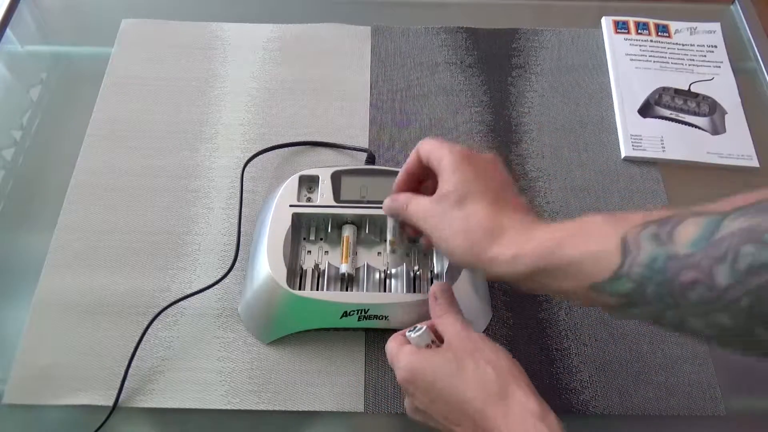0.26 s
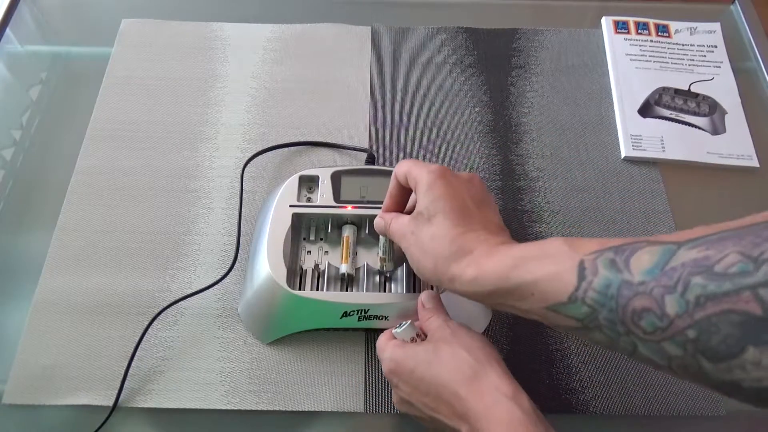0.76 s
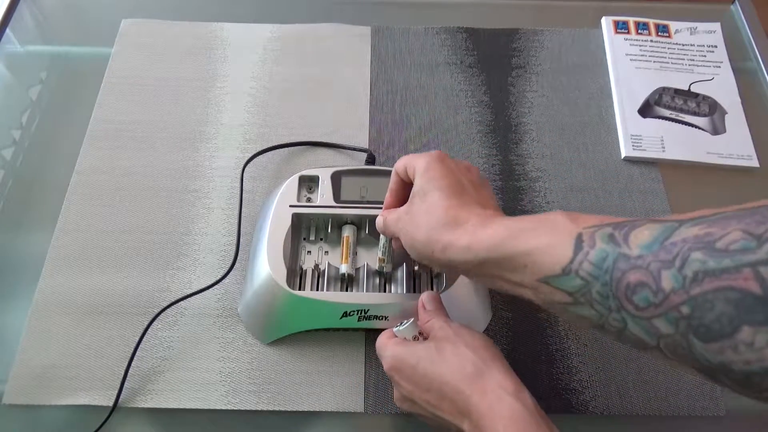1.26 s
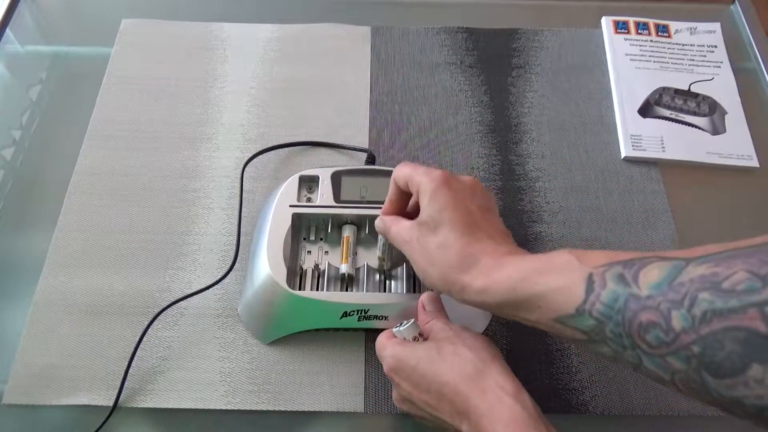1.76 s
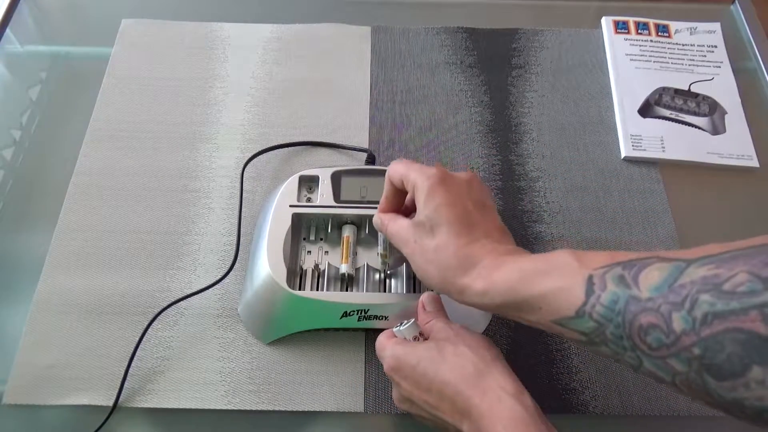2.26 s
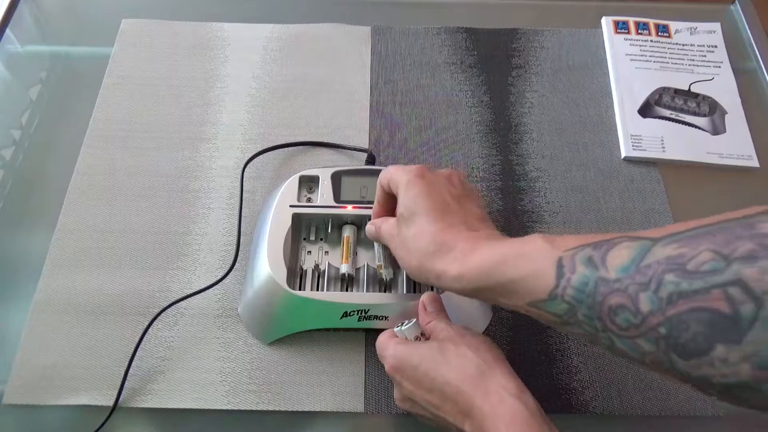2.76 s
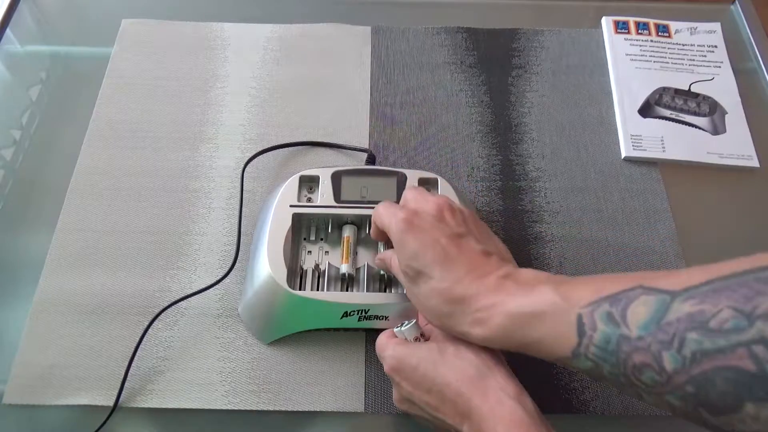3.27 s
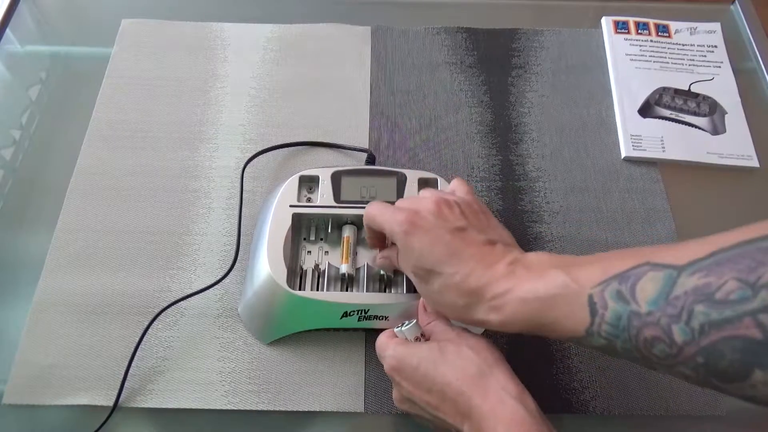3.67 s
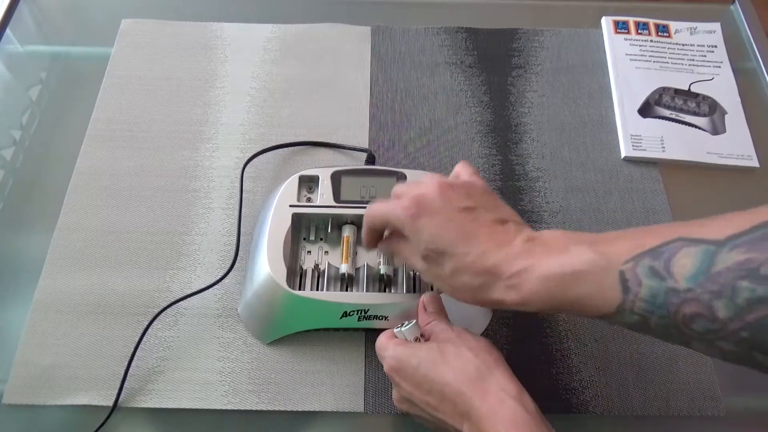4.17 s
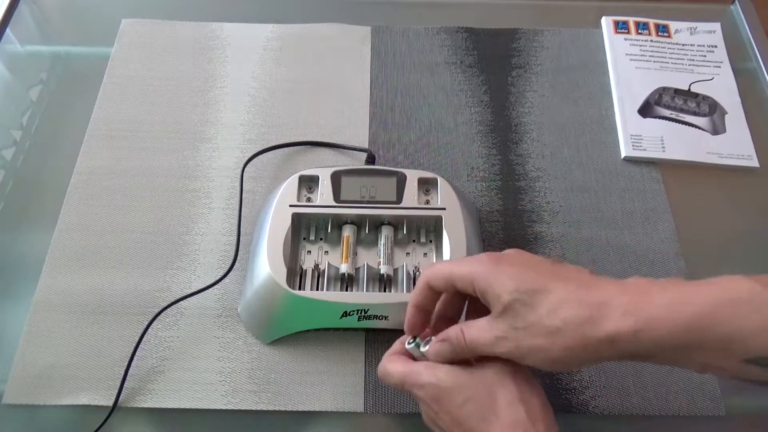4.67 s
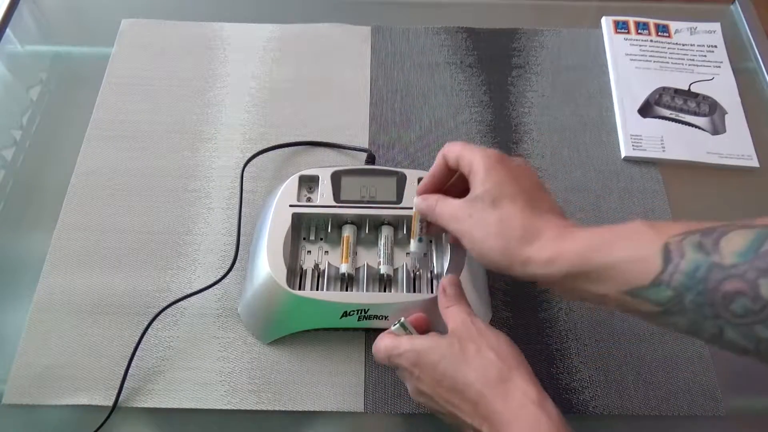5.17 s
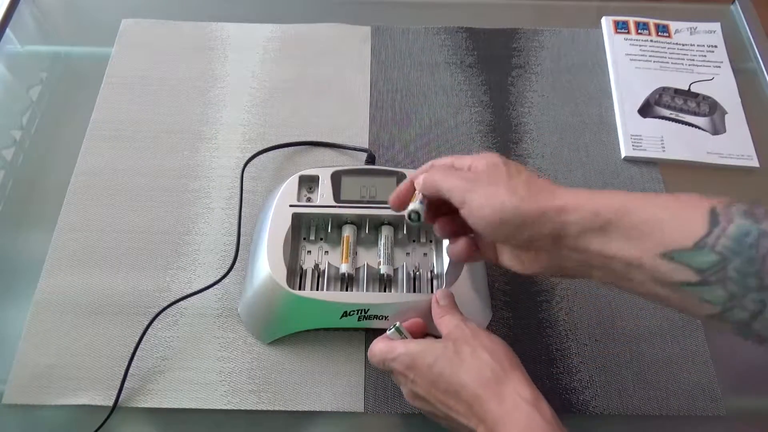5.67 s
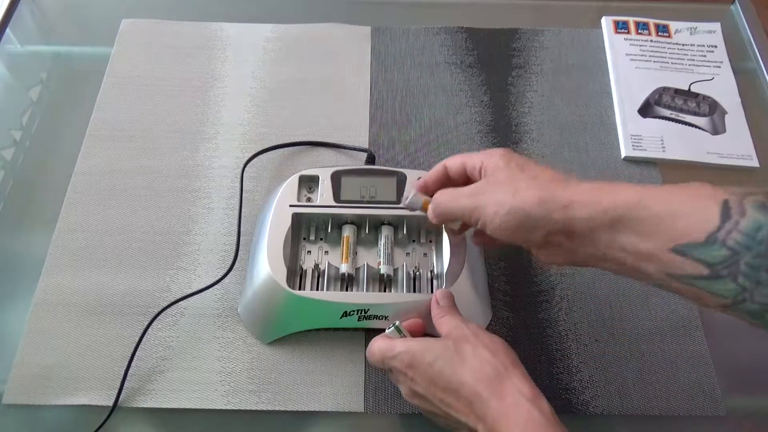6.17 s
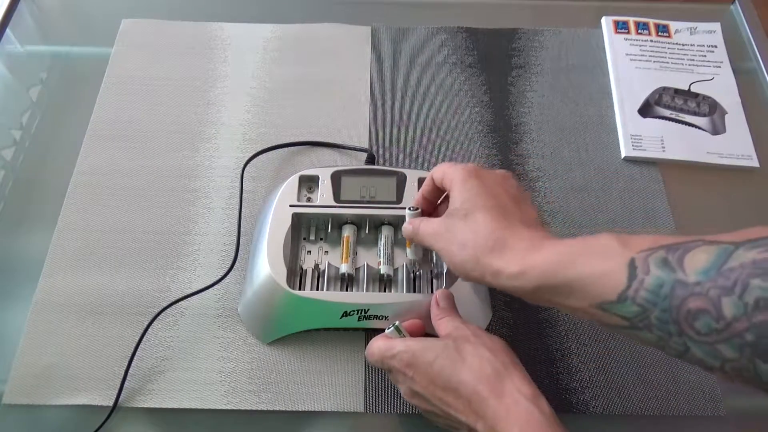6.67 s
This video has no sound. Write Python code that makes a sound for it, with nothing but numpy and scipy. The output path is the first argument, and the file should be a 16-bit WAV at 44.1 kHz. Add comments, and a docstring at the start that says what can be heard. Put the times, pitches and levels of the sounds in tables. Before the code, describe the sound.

After a light metal tap, batteries are pushed into the spring-loaded slots of a plastic charger on a glass table. Irregular plastic clacks come with steel clinks and soft table thuds, and early on a slider snaps back hard. More clacks follow, then only sparse faint clicks, rubs and a metal tap over a low room murmur, until firm clacks return at the end. The microphone is close, in a small hard room.

```python
"""A small hard room, camera microphone close to a plastic battery charger on a glass table.
After a light metal tap, batteries are pushed into the spring-loaded slots: each contact clacks the shell,
clinks the steel slider and thuds the table. At 1.35 s the slider snaps back hard; the camera's fast
limiter holds the blow down, so the room swells up behind it. From 3.3 s come only sparse clicks, rubs,
a tap and a faint squeak over room murmur and a distant drone, until firm clacks close at 6.8 s."""
import sys
import numpy as np
from scipy import signal
from scipy.fft import rfft, irfft, next_fast_len
from scipy.io import wavfile
from scipy.ndimage import uniform_filter1d, minimum_filter1d

SR = 44100
rng = np.random.default_rng(int(sys.argv[2]) if len(sys.argv) > 2 else 0)


def inscribe(sig):
    """Save sig as 16-bit PCM at rate SR to the path in sys.argv[1].

    A 1-D sig is mono; a 2-D sig holds one channel per row.
    Samples are clipped to [-1, 1] before scaling.
    """
    pcm = np.round(np.clip(np.atleast_2d(sig).T, -1, 1) * 32767)
    wavfile.write(sys.argv[1], SR, pcm.astype(np.int16))


N = 304731

# a battery strikes slider and shell: t/s, shell level/dB over 5 ms, shell f/Hz, hardness/(dB per octave),
# then cavity knock/dB, steel/dB and table thud/dB, each relative to the shell
STRIKES = [(0.36, -50, 1750, -1, -12, -7, -13), (0.4689, -16.5, 2490, 1.5, -12, -12.5, -11),
           (0.499, -24, 1870, 8, -4.5, -25, -3), (0.5096, -28.5, 2930, -3, -0.5, -6.5, -1),
           (0.681, -42.5, 1670, -6, -10, -18, -11), (0.7415, -28.5, 1760, -10, -1, -9, -11.5),
           (0.7842, -28, 2040, 1, -5.5, -18, -9.5), (0.808, -30, 2010, 9, 0, -5, 2),
           (1.005, -36.5, 1617, 3, 3.5, -9.5, 4.5), (1.183, -53, 1790, -10, 10, -3.5, 4),
           (1.336, -30.5, 1980, 0, -14, -15, -20), (1.3437, -27, 1832, 0, -9, -1.5, -15),
           (1.348, 2, 1830, 8.5, -10.5, -3, -23), (1.4946, -21.5, 1840, -2, -13, -16, -14),
           (1.556, -21, 1996, 3.5, -15, -7, -15.5), (1.747, -14.5, 1800, -2, -7, -7.5, -13.5),
           (1.759, -18, 1770, 12, -20, -6.5, -14), (1.877, -18.5, 2374, 5, -5, -2.5, -14),
           (1.8922, -16, 2050, 0.5, -10.5, -12.5, -16.5), (1.9689, -29.5, 1630, -1, 1.5, -28, -7),
           (2.0803, -20.5, 1820, 1.5, -11, -14, -15), (2.3065, -32, 1720, 10, -6, -9, -20),
           (2.311, -18, 1970, 2.5, -9, -15.5, -10.5), (2.482, -42, 2650, 0, -3, 0, -5),
           (2.5427, -31, 2560, 4.5, 5.5, -6.5, 5.5), (2.719, -47, 1520, 1, -17, -3.5, -9),
           (2.8165, -46.5, 3100, -3, 4.5, 4, 5.5), (2.8956, -45.5, 1570, 4.5, 5.5, 14, 8),
           (2.97, -28, 1550, -3.5, -2.5, -14, -8.5), (3.0044, -20.5, 2130, 1.5, 0.5, -6.5, -15),
           (3.2231, -29, 2060, -5, 1.5, -5.5, -9), (3.317, -47.5, 1950, -11, -14, -2, 1),
           (4.286, -54, 1550, 10, 9, -10, -12), (4.388, -49, 1691, 12, -8, -2, -18),
           (4.407, -55.5, 2300, 9, 1, 1, 7), (5.225, -37, 1450, 9, 7.5, -0.5, -21),
           (5.2738, -40.5, 2900, 13, -2, -1.5, -9), (5.595, -52.5, 1986, 1, 5.5, -8, -6),
           (6.4, -48.5, 1570, 1, 3.5, -3, 2), (6.7834, -12.5, 1700, -0.5, -10, -13.5, -18.5),
           (6.798, -27, 1720, 15, 7, -21, -7), (6.8681, -17.5, 1620, -2, -11.5, -16.5, -18)]
# broad colours of the plastic shell and the steel slider: f/Hz, gain/dB
SHELL_COLOUR = [(60, -56), (400, -27), (900, -15.5), (1500, -1), (2000, -1), (2700, -2), (3600, -3.5),
                (4200, -8.5), (4800, -17), (7000, -30), (16000, -77)]
STEEL_COLOUR = [(2000, -57), (4000, -17.5), (4800, -2), (5200, 1.5), (6100, 2.5), (7000, -1), (8000, -6),
                (10500, -8), (13000, -15.5), (16000, -30)]
HARD_BLOW_DB = -17.5  # above this a battery scrapes before it strikes and bounces afterwards


def clicks(evenness=0.79, springs_db=-12):
    """Every contact rings shell, cavity and steel, sets the springs singing and shakes the table."""
    # pitch of the charger's cavity, lower while the hand covers the slots: t/s, f/Hz
    cavity_pitch = [(0.47, 950), (1.0, 1230), (2.55, 1230), (2.95, 1050), (3.3, 1040), (4.3, 1370),
                    (6.4, 1280), (6.8, 1090)]
    # modes of the slider springs and contact strips: f/Hz, level/dB, t60/s
    spring_modes = [(933, 2, 0.25), (1074, 3.5, 0.21), (1278, 5, 0.16), (1750, -7, 0.5), (3325, -6, 0.56),
                    (4560, -12, 0.5), (5140, -19, 0.25), (5960, -21.5, 0.2844)]
    # modes of the glass table: f/Hz, level/dB, t60/s
    table_modes = [(119.9, -14, 0.74), (158.8, -12.5, 0.5), (200.5, -7.5, 0.22), (246, -6, 0.5),
                   (284.2, -4.5, 0.61), (303, 3.5, 0.21), (336, 1, 0.2), (370, -2, 0.38),
                   (414.4, -10, 0.5576), (474, -8, 0.27), (573.4, -10, 0.21)]
    out = np.zeros(N)
    for s, db, steel_db, shell_hz, hard_db, knock_db, thud_db, chatter_s in contacts():
        knock_hz = np.interp(s, *np.transpose(cavity_pitch))
        forces = [chatter(chatter_s), chatter(chatter_s), chatter(0.74 * chatter_s)]
        # summed over all directions, the comb of the micro-bounces partly evens out
        evened = [force + evenness * np.linalg.norm(force) * impulse() for force in forces]
        voicing = db, hard_db, shell_hz, knock_hz, knock_db, steel_db
        add(out, s, in_room(charger(forces, *voicing), charger(evened, *voicing), wet_db=-7))
        springs = ringing(spring_modes, attack_s=0.002097, scatter_db=-2, spread=0.001)
        add(out, s, blow(springs, db + springs_db))
        thud = ringing(table_modes, attack_s=0.004, scatter_db=3.5, spread=0.0413)
        add(out, s, blow(thud, db + thud_db))
    return out


def contacts(rebound_db=-5, rebound_steel_db=6):
    """Each strike, and after a hard blow the battery's rebound: weaker, but more on the steel."""
    # the harder the blow, the longer the battery is in the air: level/dB, flight/s
    flight_times = [(-17.5, 0.0035), (-12, 0.0075)]
    for s, db, shell_hz, hard_db, knock_db, steel_db, thud_db in STRIKES:
        flight_s = np.interp(db, *np.transpose(flight_times)) if db > HARD_BLOW_DB else 0
        chatter_s = 0.003 + 0.19 * flight_s  # a longer flight also rattles longer
        touch = shell_hz, hard_db, knock_db, thud_db, chatter_s
        yield s, db, steel_db, *touch
        if flight_s:
            yield s + flight_s, db + rebound_db, steel_db + rebound_steel_db, *touch


def charger(forces, db, hard_db, shell_hz, knock_hz, knock_db, steel_db):
    """Three forces drive the shell's clack, the cavity's hollow knock and the slider's clink."""
    # broad colour of the cavity: f/Hz, gain/dB
    hollow_colour = [(50, -41), (200, -22), (470, -13), (680, -7), (900, -3.5), (1300, -6), (1700, -5.5),
                     (3000, -35.5), (8000, -71)]
    cavity = np.array(hollow_colour) * [knock_hz / 1170, 1]  # the colour moves with the knock's pitch
    shell = body(forces[0], SHELL_COLOUR, hard_db, shell_hz, width_hz=340, peak=1.67)
    knock = body(forces[1], cavity, 0, knock_hz, width_hz=153, peak=1.76)
    steel = body(forces[2], STEEL_COLOUR, hard_db)
    return blow(shell, db) + blow(knock, db + knock_db) + blow(steel, db + steel_db)


def chatter(decay_s, first_touch=1.95, rise_s=0.00052):
    """Force of one contact: a first touch, then a few milliseconds of micro-bounces."""
    t = np.arange(SR // 25) / SR
    envelope = np.exp(-(t / decay_s) ** 1.03) * (1 - np.exp(-t / rise_s))
    force = envelope * rng.standard_normal(len(t))
    force[0] += first_touch
    return np.pad(force, (12, 0))


def impulse():
    """Force of one ideal sharp touch."""
    return signal.unit_impulse(SR // 25 + 12, 12)


def body(force, colour, hard_db=0, hz=2000, width_hz=400, peak=0):
    """A part colours the force: brighter for a hard contact, with a resonance set by the spot struck."""
    def response(f):
        octaves = np.log2(np.clip(f, 1500, 12000) / 1500)
        return amp(along(colour, f) + hard_db * octaves) * (1 + peak * resonance(f, hz, width_hz))
    return filtered(force, response)


def ringing(modes, attack_s, scatter_db, spread):
    """Decaying modes, struck at new strengths and slightly new pitches by every blow."""
    t = np.arange(SR // 2) / SR
    hz, db, t60 = np.transpose(modes)[:, :, None]
    gain, phase, detune = rng.standard_normal((3, len(modes), 1))
    decays = amp(db + scatter_db * gain - 60 * t / t60)
    tones = np.sin(2 * np.pi * (hz * (1 + spread * detune) * t + phase))
    return (decays * tones).sum(0) * (1 - np.exp(-t / attack_s))


def pushes(hz=136, width_hz=50, t60=0.5092):
    """A soft hand presses the charger onto its mat and gives only a dull low bump."""
    # presses of the hand: t/s, level/dB over 5 ms
    presses = [(0.488, -35.5), (0.749, -37.5), (1.769, -41.5), (2.491, -42.5), (2.831, -37.5), (3.009, -33),
               (3.209, -37.5), (5.275, -40)]
    out, t = np.zeros(N), np.arange(SR // 2) / SR
    for s, db in presses:
        force = rng.standard_normal(len(t)) * amp(-60 * t / t60)
        bump = filtered(force, lambda f: resonance(f, hz, width_hz) ** 2)
        add(out, s, blow(bump, db))
    return out


def taps():
    """Small metal on metal, such as a finger ring on a battery: a very short high ping."""
    # light taps: t/s, level/dB over 5 ms, dull shell part/dB relative to the ping
    touches = [(0.1796, -40.5, -6.5), (0.1854, -46, -6.5), (4.5003, -29, -19.5), (4.516, -58, 3)]
    # resonances of the finger ring: f/Hz, width/Hz, level/dB
    ring_modes = [(5698.5, 913.9, -0.5), (10300, 1155, -10), (11000, 1100, -22.5)]
    out = np.zeros(N)
    ping = filtered(impulse(), lambda f: sum(amp(db) * resonance(f, hz, width_hz) ** 2
                                             for hz, width_hz, db in ring_modes))
    for s, db, dull_db in touches:
        dull = body(chatter(decay_s=0.001452), SHELL_COLOUR)
        tap = blow(ping, db) + blow(dull, db + dull_db)
        add(out, s, in_room(tap, tap, wet_db=-12))
    return out


def rubs(grain=0.35, lead_s=0.0077, lead_db=-28, lead_hard_db=-21):
    """Sliding is a stream of tiny uneven catches into shell and steel."""
    # a battery slides along its slot: t/s, length/s, level/dB, hardness/(dB per octave)
    slides = [(.36, 0.2, -55.5, -2.5), (1.323, 0.0087, -42.5, -8.5), (2.505, 0.05, -45.5, -17),
              (2.821, 0.11, -48, 0), (3.129, 0.063, -47, 0), (3.476, 0.051, -54.5, -3),
              (5.289, 0.021, -46.5, 3), (5.375, 0.054, -56, -2), (5.545, 0.044, -58.5, -1),
              (6.55, 0.066, -58, -2), (6.728, 0.045, -53, -1)]
    # just before a hard blow the battery scrapes off the slider's edge
    lead_ins = [(s - lead_s, lead_s, db + lead_db, lead_hard_db)
                for s, db, *_ in STRIKES if db > HARD_BLOW_DB]
    out = np.zeros(N)
    for s, length_s, db, hard_db in slides + lead_ins:
        n = int(max(length_s, 0.01) * SR)
        catches = rng.standard_normal(n) * np.exp(grain * rng.standard_normal(n))
        stroke = amp(db) * np.sqrt(np.hanning(n).clip(0))
        friction = body(catches, SHELL_COLOUR, hard_db) + 0.5 * body(catches, STEEL_COLOUR, hard_db)
        scrape = stroke * unit(friction)
        add(out, s, in_room(scrape, scrape, wet_db=-5))
    return out


def squeak(middle_s=4.63, half_s=0.15, db=-70, top_hz=8304, sag_hz=725.7, fuzz=0.09):
    """Two faint fuzzy tones glide up and down together, loudest at the top of the arch."""
    t = np.arange(N) / SR
    arch = np.clip(1 - ((t - middle_s) / half_s) ** 2, 0, 1)
    hz = top_hz - sag_hz * (1 - arch)
    phase = 2 * np.pi * np.cumsum(hz * (1 + fuzz * rng.standard_normal(N))) / SR
    return amp(db) * arch * (np.sin(phase) + 0.7 * np.sin(1.43 * phase))


def in_room(direct, radiated, wet_db, build_s=0.003):
    """The direct sound at the microphone, plus a fresh room tail fed by what radiates all round."""
    # the small room dies away sooner in the treble: f/Hz, t60/s
    decay_times = [(150, 0.8), (700, 0.56), (2000, 0.39), (5000, 0.43), (9000, 0.24), (15000, 0.24)]
    hz, t = np.fft.rfftfreq(256, 1 / SR), np.arange(220) * 128 / SR
    noise = rng.standard_normal((len(hz), len(t))) + 1j * rng.standard_normal((len(hz), len(t)))
    decay = amp(-60 * t / along(decay_times, hz)[:, None])
    tail = signal.istft(noise * decay, nperseg=256)[1]
    tail *= 1 - np.exp(-np.arange(len(tail)) / SR / build_s)
    wet = signal.fftconvolve(radiated, amp(wet_db) * tail / np.linalg.norm(tail))
    return wet + np.pad(direct, (0, len(wet) - len(direct)))


def room_tone(db=-55.5, stereo_width=0.10366):
    """Room murmur and microphone hiss, nearly mono and a touch to the left."""
    # colour of the noise floor: f/Hz, gain/dB
    floor_colour = [(20, -26), (45, -16), (85, -12.5), (120, -4), (210, -8), (330, -5.5), (450, -8),
                    (600, -18.5), (850, -15), (1500, -22), (3000, -27.5), (6000, -29), (10000, -31.5),
                    (16000, -33)]
    mid, side = unit(filtered(rng.standard_normal((2, N)), lambda f: amp(along(floor_colour, f))))
    air = np.array([mid + stereo_width * side, mid - stereo_width * side])
    return amp(db) * air * amp([[0.4], [-0.4]])


def drone(hz=63.5, waver_hz=3):
    """A distant wavering drone swells and fades, left of centre."""
    # swells: crest t/s, level/dB, time to fall 9 dB/s
    swells = [(0.58, -70, 0.2), (4.03, -60, 0.3), (4.79, -59.5, 0.12)]
    t = np.arange(N) / SR
    waver = unit(filtered(rng.standard_normal(N), lambda f: np.exp(-(f / waver_hz) ** 2)))
    envelope = sum(amp(db) * np.exp(-((t - s) / fall_s) ** 2) for s, db, fall_s in swells)
    tone = unit(np.sin(2 * np.pi * hz * t + 0.6 * waver))
    return envelope * tone * amp([[1.2], [-1.2]])


def whine():
    """The camera's electronics give a thin steady whine."""
    # whine tones: f/Hz, level/dB
    tones = [(8640, -81), (9119, -80), (13248, -83)]
    t = np.arange(N) / SR
    return sum(amp(db) * unit(np.sin(2 * np.pi * hz * t)) for hz, db in tones)


def two_ports(x, lag_s=0.0016):
    """Nearly mono: a weak late copy makes the microphone ports differ in the treble; bass leans left."""
    # difference between the two ports: f/Hz, side level/dB
    port_difference = [(100, -42), (500, -16.5), (1500, -33), (4000, -30), (6000, -19.5), (9000, -13.5),
                       (14000, -29)]
    late = filtered(x, lambda f: amp(along(port_difference, f)) * 1j * np.exp(-2j * np.pi * f * lag_s))
    bass = filtered(x, lambda f: 0.16 / (1 + (f / 380) ** 3))
    side = late + bass
    return np.array([x + side, x - side])


def limiter(x, ceiling_db=-10, recovery_s=0.031):
    """Peaks pull the gain down at once; the cut in dB then fades exponentially."""
    over_db = np.maximum(20 * np.log10(np.abs(x).max(0) + 1e-9) - ceiling_db, 1e-6)
    ramp = np.arange(N) / SR / recovery_s
    cut_db = np.exp(np.maximum.accumulate(np.log(over_db) + ramp) - ramp)
    return x * uniform_filter1d(minimum_filter1d(amp(-cut_db), size=25), size=25)


def amp(db):
    return 10 ** (np.asarray(db) / 20)


def unit(x):
    return x / np.sqrt(np.mean(x ** 2) + 1e-20)


def blow(x, db):
    """Scale a short sound to the energy of 5 ms at this level."""
    return x * amp(db) * np.sqrt(0.005 * SR / (np.sum(x ** 2) + 1e-20))


def along(points, hz):
    """Interpolate (f/Hz, value) points on a log frequency axis."""
    f, values = np.transpose(points)
    return np.interp(np.log(hz + 1), np.log(f), values)


def resonance(f, hz, width_hz):
    """Band-pass response of one damped mode."""
    return 1j * f * width_hz / (hz * hz - f * f + 1j * f * width_hz)


def filtered(x, response):
    """Pass x through a complex frequency response."""
    n = x.shape[-1]
    padded = next_fast_len(n + 2048)
    return irfft(rfft(x, padded) * response(np.fft.rfftfreq(padded, 1 / SR)), padded)[..., :n]


def add(track, s, x):
    """Mix x into the track at s seconds."""
    start = max(round(s * SR), 0)
    part = x[..., :max(N - start, 0)]
    track[..., start:start + part.shape[-1]] += part


def scene():
    """The charger close to the microphone, over the quiet of the room."""
    close = clicks() + pushes() + taps() + rubs() + squeak()
    return two_ports(close) + room_tone() + drone() + whine()


def record(dry, low_hz=42.0, top_hz=16100):
    """The camera limits the peaks, thins the deep bass and keeps nothing above its band limit."""
    held = filtered(limiter(dry), lambda f: f ** 3 / np.sqrt(f ** 6 + low_hz ** 6))
    return filtered(held, lambda f: 1 / np.sqrt(1 + (f / top_hz) ** 160))


dry = scene()
out = record(dry)
inscribe(out)
```